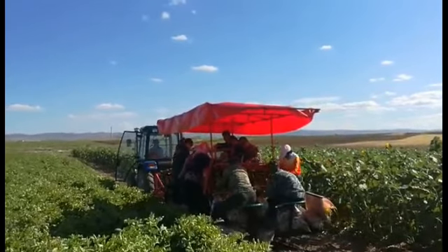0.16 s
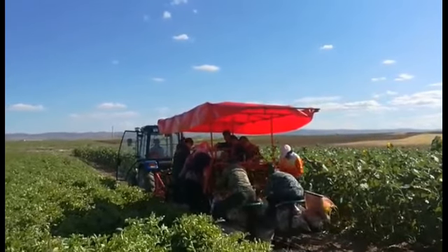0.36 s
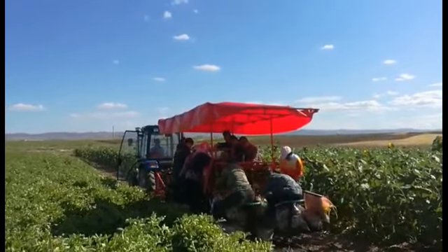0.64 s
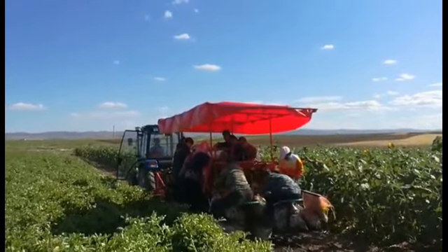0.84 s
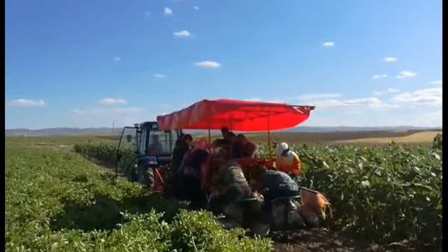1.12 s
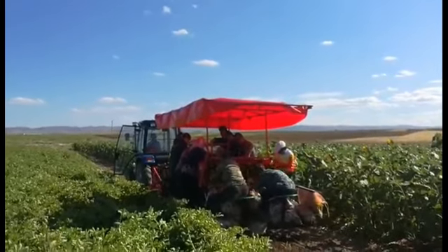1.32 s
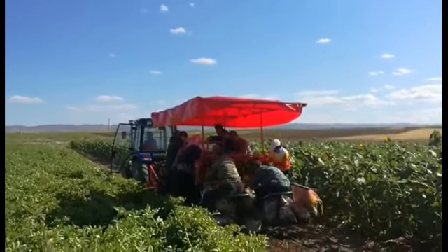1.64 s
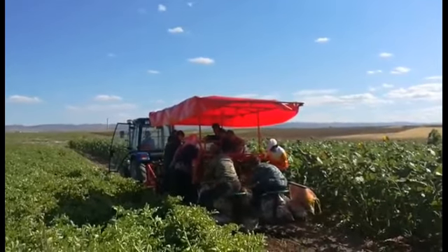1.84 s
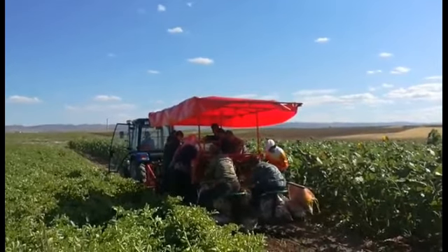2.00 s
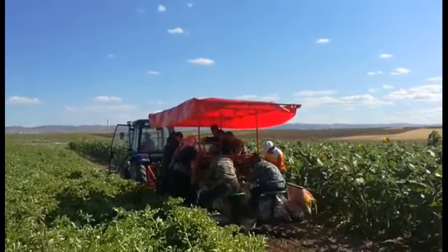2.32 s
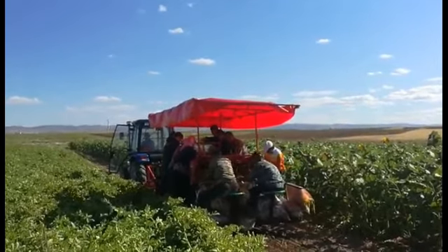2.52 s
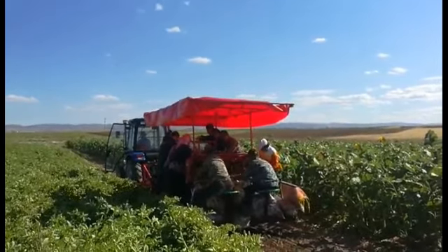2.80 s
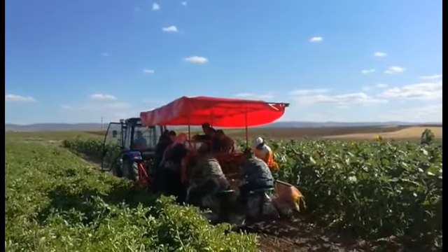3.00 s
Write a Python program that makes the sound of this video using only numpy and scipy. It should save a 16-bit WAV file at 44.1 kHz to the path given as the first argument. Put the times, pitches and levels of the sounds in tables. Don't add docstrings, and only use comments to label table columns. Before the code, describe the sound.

Tractor-drawn harvester rumbling, its metal web clattering in quick bursts while wind buffets the microphone.

```python
import sys
import numpy as np
from scipy import signal
from scipy.fft import rfft, irfft, next_fast_len
from scipy.io import wavfile
from scipy.ndimage import uniform_filter1d

SR = 44100
rng = np.random.default_rng(int(sys.argv[2]) if len(sys.argv) > 2 else 0)


def invert_db(level):
    return 10 ** (np.asarray(level, dtype=float) / 20)


def transcribe(signal):
    frames = np.atleast_2d(signal).T
    limited = np.clip(frames, -1, 1)
    pcm = np.round(limited * 32767).astype(np.int16)
    wavfile.write(sys.argv[1], SR, pcm)


N = 138915


def rms_one(x):
    return x / np.sqrt(np.mean(x ** 2) + 1e-20)


def in_time(rows):
    s, *columns = np.transpose(rows)
    return [np.interp(np.arange(N) / SR, s, c) for c in columns]


def at_hz(points, hz):
    point_hz, values = np.transpose(points)
    return np.interp(np.log(hz + 1), np.log(point_hz + 1), values)


def drift(rate_hz):
    r = np.exp(-80 * np.pi * rate_hz / SR)
    noise = rng.standard_normal(N // 40 + 2002)
    slow = signal.lfilter([1], [1, -2 * r, r * r], noise)[2000:]
    return np.interp(np.arange(N) / 40, np.arange(len(slow)), rms_one(slow))


def ring(hits, hz, t60_s):
    r, w = invert_db(-60 / (t60_s * SR)), 2 * np.pi * hz / SR
    return signal.lfilter([0, np.sin(w)], [1, -2 * r * np.cos(w), r * r], hits + 1e-18)


def coloured(x, spectrum):
    gain = invert_db(at_hz(spectrum, np.fft.rfftfreq(N, 1 / SR)))
    return irfft(rfft(x) * rms_one(gain), N)


def bandpass(x, order, low_hz, high_hz):
    return signal.sosfilt(signal.butter(order, [low_hz, high_hz], "band", fs=SR, output="sos"), x)


def clicks(per_s, spread_db):
    sizes = invert_db(spread_db * np.minimum(rng.exponential(1, N), 5)) * rng.choice([-1, 1], N)
    return rms_one(sizes * (rng.random(N) < per_s / SR))


def burst(start_s, decay_s, attack_s):
    t = np.maximum(np.arange(N) / SR - start_s, 0)
    return (1 - np.exp(-t / attack_s)) * np.exp(-t / decay_s)


# time_s, firing_hz
FIRING = [(0.0, 25.67), (1.81, 24.87), (3.15, 25.93)]
# multiple_of_firing, level_db
ORDERS = [(1, -45), (2, -43), (3, -44.5), (4, -46), (6, -49), (10, -54)]
# hz, density_db_per_hz
DRONE = [(15, -20), (25, -3.5), (59, -5.5), (94, 4), (137, 6), (249, -1), (321, -12), (700, -41.5),
         (910, -47.5), (1540, -120)]
DRONE_DB, DRONE_THROB_DB, DRONE_FADE_DB_PER_S = -41, 3, 1.5
ORDER_WOBBLE_DB = 3.5


def engine():
    turn = 2 * np.pi * np.cumsum(in_time(FIRING)[0]) / SR
    tones = np.zeros(N)
    for k, level_db in ORDERS:
        height = np.sqrt(2) * invert_db(level_db + ORDER_WOBBLE_DB * drift(5.1))
        tones += height * np.sin(k * turn + rng.uniform(0, 2 * np.pi))
    fade_db = DRONE_FADE_DB_PER_S * (np.arange(N) - N / 2) / SR
    gain = invert_db(DRONE_DB - fade_db + DRONE_THROB_DB * np.sin(turn))
    colour = DRONE[:-1] + [(1400, -120), (1540, -79.5)]
    return tones + gain * coloured(rng.standard_normal(N), colour)


# hz, width_hz, level_db
FRAME = [(560, 40, -4.5), (973, 175, 3.5), (1420, 79, 5), (1850, 87, 5.5), (2299, 75, 5), (2688, 59, 2.5),
         (2950, 200, -25.5), (4255, 610, -4.5)]


def frame(x):
    out = 0
    for k, (hz, width_hz, level_db) in enumerate(FRAME):
        r = np.exp(-np.pi * width_hz / SR)
        poles = [1, -2 * r * np.cos(2 * np.pi * hz / SR), r * r]
        out = out + (-1) ** k * invert_db(level_db) * signal.lfilter([1 - r, 0, r - 1], poles, x)
    return out


# hz, density_db_per_hz
GEAR = [(240, -40.5), (400, -4.5), (670, -5.5), (1000, -5.5), (1850, 0), (2460, -5), (4010, -9),
        (5000, -17.5), (6000, -32.5), (7350, -36), (8150, -42), (8690, -79), (11300, -99), (19100, -120)]
GEAR_DB, GEAR_PATCHY_DB = -44, 1.45
CHAIN_DB, CHAIN_PER_S = -45.5, 900


def running_gear():
    gear_level = invert_db(GEAR_DB + GEAR_PATCHY_DB * drift(14.0))
    gear = gear_level * coloured(rng.standard_normal(N), [(200, -62)] + GEAR)
    chain_level = invert_db(CHAIN_DB + drift(12.0))
    return gear + chain_level * rms_one(frame(clicks(CHAIN_PER_S, 2.0)))


# hz, density_db_per_hz
CLATTER = [(400, -18), (1000, -6), (2000, 2.5), (3500, 0), (5100, -5), (6200, -19), (8500, -28.5)]
# start_s, peak_db, ring_hz, clatter_db, decay_s
SHAKES = [(0.065, -29.5, 1880, 8, 0.015), (0.088, -30.5, 1930, 0.5, 0.072), (0.283, -25.5, 1950, 3, 0.021),
          (0.374, -27, 1866, 0, 0.046), (0.493, -32, 1670, 5, 0.027), (0.552, -35, 1810, 1, 0.086),
          (0.669, -28, 1920, -5, 0.046), (0.778, -36.5, 1830, 1, 0.034), (0.812, -41, 2010, 3.5, .02),
          (0.852, -26, 1955, -4, .05), (0.96, -34.5, 1850, 1.5, 0.035), (1.04, -32, 1510, 0, 0.048),
          (1.141, -24.5, 1937, -0.5, 0.022), (1.172, -27.5, 1850, 1.5, 0.014),
          (1.247, -25.5, 1910, -5.5, .03), (1.428, -31.5, 1420, 3.5, 0.013), (1.455, -30.5, 1710, 7, 0.017),
          (1.4946, -28.5, 1870, 2.5, 0.024), (1.514, -38, 4600, -2, 0.019), (1.54, -27, 1850, 0.5, 0.022),
          (1.721, -25.5, 1833, 0, 0.03), (1.831, -23.5, 1910, -0.5, 0.015), (1.956, -25.5, 1930, 2.5, .04),
          (2.001, -30, 2030, 0.5, 0.036), (2.119, -35.5, 1903, -1, 0.12), (2.234, -28.5, 1850, -6, 0.038),
          (2.309, -31.5, 1870, 3.5, 0.019), (2.412, -21.5, 1980, -4.5, 0.024),
          (2.459, -35, 1930, -17, 0.005), (2.57, -37, 1540, 5.5, 0.034), (2.587, -30.5, 1730, 0.5, 0.041),
          (2.642, -32.5, 1500, 4, 0.018), (2.716, -32, 1910, -2.5, 0.021), (2.797, -24, 1880, -3, 0.056),
          (2.875, -27.5, 1895, 0.5, 0.041), (2.938, -30, 2020, 7.5, 0.017), (3.006, -27, 1430, -1.5, 0.024),
          (3.105, -29.5, 1460, 1.5, .041)]
SHAKE_PER_S, SHAKE_ATTACK_S, SHAKE_T60_S = 2500, 0.013, 0.035
SHAKE_WIDE_DB, SHAKE_RING_DB, SHAKE_FRAME_DB = -5.5, -9.5, -12


def shakes():
    contacts = clicks(SHAKE_PER_S, 3.43)
    own, under, wide = np.zeros((3, N))
    for start_s, peak_db, ring_hz, clatter_db, decay_s in SHAKES:
        hits = invert_db(peak_db) * burst(start_s, decay_s, SHAKE_ATTACK_S) * contacts
        under += hits
        wide += invert_db(clatter_db) * hits
        own += ring(hits, ring_hz, SHAKE_T60_S) / np.sqrt(SHAKE_T60_S * SR / 53.6)
    clatter = coloured(wide, CLATTER)
    frame_ring = frame(under) / np.std(frame(contacts))
    return invert_db(SHAKE_WIDE_DB) * clatter + invert_db(SHAKE_RING_DB) * own + invert_db(SHAKE_FRAME_DB) * frame_ring


# start_s, peak_db
CLANKS = [
    (1.458, -42),
    (1.4636, -23.5),
    (1.506, -34),
    (3.012, -34),
]
# hz, level_db, t60_s
BAR = [(1145, -8, 0.097), (1600, -18, 0.039), (2325, 0, 0.062), (2800, -14, 0.03), (3125, 3, 0.062),
       (3400, -39, 0.0257), (4600, -10, 0.05), (5060, -17, 0.024), (8110, -24, 0.08), (8310, -31, 0.08)]
BAR_LATE_CYCLES, TOUCH_T60_S = 6.84, 0.012


def clanks():
    start_s, peak_db = np.transpose(CLANKS)
    out = np.zeros(N)
    for hz, level_db, t60_s in BAR:
        hits = np.zeros(N)
        at = ((start_s + BAR_LATE_CYCLES / hz) * SR).astype(int)
        hits[at] = invert_db(peak_db + level_db + rng.normal(0, 1, len(at)))
        touch = ring(hits, hz, TOUCH_T60_S)
        out += ring(touch, hz, t60_s) * 2 * np.log(1000) / (TOUCH_T60_S * SR)
    return out


THUMP_S, THUMP_DB = 1.545, -37


def thump():
    noise = bandpass(rng.standard_normal(N), 2, 300, 800)
    return invert_db(THUMP_DB) * burst(THUMP_S, 0.023, 0.011) * rms_one(noise)


# start_s, level_db
CHIRPS = [
    (0.271, -64.5),
    (0.604, -64),
    (1.5, -72),
    (2.18, -69.5),
]
CHIRP_HZ, CHIRP_S = 11400, 0.02


def chirps():
    t = np.arange(N) / SR
    swell = np.zeros(N)
    for start_s, level_db in CHIRPS:
        swell += invert_db(level_db) * np.exp(-((t - start_s - CHIRP_S / 2) / CHIRP_S * 2) ** 2)
    return swell * np.sin(2 * np.pi * CHIRP_HZ * t + 2.0 * drift(60.0))


# centre_s, level_db, half_length_s, hz, width_hz
LEAVES = [(1.167, -73.5, .012, 9350, 700), (1.222, -73, .022, 8670, 607), (1.487, -53.5, 0.032, 8270, 900),
          (1.468, -62, 0.012, 8900, 1000), (1.617, -76.5, .012, 9400, 696), (1.745, -77, .014, 8500, 800),
          (2.2, -71, .014, 9050, 910), (2.64, -80, .02, 13530, 2400), (2.655, -68.5, .014, 9550, 2500),
          (2.745, -79, .016, 9100, 1000), (2.8, -68, .026, 8940, 1000), (2.805, -69, .026, 12700, 1920),
          (2.815, -71.5, .016, 14650, 700), (2.95, -64, .026, 9000, 2000), (2.955, -78, .022, 11600, 1500),
          (3.065, -86, .015, 9900, 500), (3.135, -72, .02, 12100, 1550), (3.135, -70, .016, 9100, 700)]


def leaves():
    t, out = np.arange(N) / SR, np.zeros(N)
    grains = clicks(6300, 3.0)
    for centre_s, level_db, half_length_s, hz, width_hz in LEAVES:
        rustle = rms_one(bandpass(grains, 4, hz - width_hz / 2, hz + width_hz / 2))
        out += invert_db(level_db) * np.exp(-((t - centre_s) / half_length_s) ** 4) * rustle
    return out


# time_s, level_db
GUST = [(0, -43), (.09, -37), (.2, -43), (.37, -35.5), (.6, -49.5), (.7, -34.5), (.76, -40), (.84, -34.5),
        (.95, -42.5), (1.1, -37.5), (1.2, -47), (1.33, -30.5), (1.52, -52.5), (1.63, -45.5), (1.7, -35.5),
        (1.82, -42.5), (2.3, -42.5), (3.15, -61)]
WIND_DB, WIND_LUMP_DB, WIND_APART_DB = 4.5, 4.5, -5.5
WIND_LOW_HZ, GUST_TOP_HZ, GUST_OPENS = 44.57, 178, 0.05
WIND_EVEN = 0.6


def wind():
    level_db, = in_time(GUST)
    top_hz = GUST_TOP_HZ * invert_db(GUST_OPENS * (level_db - level_db.mean()))
    edges_hz, out = WIND_LOW_HZ * 2 ** np.arange(-1, 4.1, .5), 0
    for low_hz, high_hz in zip(edges_hz, edges_hz[1:]):
        mid, side = bandpass(rng.standard_normal((2, N)), 2, low_hz, high_hz)
        hz = np.sqrt(low_hz * high_hz)
        slopes = (1 + (hz / top_hz) ** 8) * (1 + (WIND_LOW_HZ / hz) ** 4)
        gain = invert_db(WIND_LUMP_DB * drift(hz / 25.0)) / np.sqrt(slopes * top_hz / SR * 2)
        out = out + gain * (mid + invert_db(WIND_APART_DB) * hz / 150 * side * [[1], [-1]])
    swell = uniform_filter1d(np.mean(out ** 2, axis=0), size=1500)
    level = invert_db(level_db + WIND_DB + 0.27 * drift(36.0))
    return level * out * (swell.mean() / swell) ** (WIND_EVEN / 2)


# centre_s, peak_db, pitch_hz, length_cycles
BUFFETS = [(0.027, -26.5, 70.2, 9.5), (0.149, -26, 63.7, 3.3), (0.36, -18.5, 89, 4.5),
           (0.422, -23.5, 85, 7.7), (0.462, -14.5, 97.4, 2.24), (0.517, -19, 100, 3.7),
           (0.558, -17.5, 81, 0.51), (0.593, -21.5, 72.5, 2.5), (0.692, -29.5, 108, 4.8),
           (0.788, -23, 103, 5.3), (0.827, -18.5, 194, 2.3), (0.873, -22, 103.5, 3.3),
           (1.004, -22, 108, 3.5), (1.006, -16.5, 153, 4.5), (1.284, -20, 145, 4.3),
           (1.229, -26.5, 112, 3.3), (1.326, -26.5, 119, 4.6), (1.352, -32, 99, 3.2), (1.378, -21, 90, 3.3),
           (1.399, -18, 153, 2.3), (1.687, -16, 99, 0.84), (1.718, -13.5, 110, 0.54),
           (1.745, -24.5, 60, 0.55), (1.77, -19, 86, 1.5), (1.805, -14.5, 175, 0.86),
           (1.824, -17, 60, 0.74), (1.85, -24.5, 100, 2.5), (1.899, -29, 87.5, 1.9),
           (2.102, -22.5, 88, 0.86), (2.002, -17, 138, 2.5), (2.01, -22, 49, 2.4), (2.203, -23, 68, 2.47),
           (2.233, -22.5, 130, 3), (2.315, -25, 76, 2.6), (2.331, -20, 134, 3.8), (2.502, -25, 90, 2.5),
           (0.291, -27, 74.5, 1.8), (.385, -24, 202, 4.9), (1.434, -23, 90.5, 1.7), (2.689, -28, 90, 3.2)]
BUFFET_DB, BUFFET_LAG_S = -0.5, 0.00059


def buffets():
    t, out = np.arange(N) / SR, np.zeros((2, N))
    for centre_s, peak_db, pitch_hz, cycles in BUFFETS:
        lag, turn = rng.standard_normal(2)
        u = (t - centre_s - BUFFET_LAG_S * lag * np.array([[1], [-1]])) * pitch_hz
        wave = np.cos(2 * np.pi * u + 0.41 * cycles * turn)
        out += invert_db(peak_db + BUFFET_DB) * wave * np.exp(-(2 * u / cycles) ** 2)
    return out


MACHINE_TOP_HZ = 8105


def dulled(x):
    return irfft(rfft(x) / (1 + (np.fft.rfftfreq(N, 1 / SR) / MACHINE_TOP_HZ) ** 30), N)


# hz, lead_rad
LEAD = [(0, 0), (260, -0.06), (690, 1.5), (950, -0.9), (1640, 1), (2240, -1.33), (2840, -8), (3530, -5),
        (4650, -7), (6370, -8.5), (8440, 3)]
# hz, lean_db
LEAN = [(60, -1.5), (300, 2.5), (1000, 0), (2000, 3), (4000, 8), (6000, 4.5), (8000, 5.5), (12000, 1.5)]
# hz, share_db
SCATTER = [(60, -30.5), (300, -16.5), (700, -12.5), (1500, -7), (2500, -3), (4000, -1.1), (8000, 0)]


def ports(x, scatter_s, size=next_fast_len(N + SR)):
    hz, tail_s = np.fft.rfftfreq(size, 1 / SR), np.arange(SR) / SR
    smear = rng.standard_normal((2, SR)) * np.exp(-tail_s / scatter_s)
    smear = rfft(smear / np.sqrt(np.sum(smear ** 2, axis=1, keepdims=True)), size)
    share = np.clip(invert_db(at_hz(SCATTER, hz)), 0, 1)
    half = np.array([[.5], [-.5]])
    direct = np.sqrt(1 - share ** 2) * np.exp(1j * half * np.interp(hz, *np.transpose(LEAD)))
    lean = invert_db(half * at_hz(LEAN, hz))
    return irfft(rfft(x, size) * lean * (direct + share * smear), size)[:, :N]


FIELD_SCATTER_S, SHAKE_SCATTER_S, NEAR_SCATTER_S = 0.2, 0.011, 0.005


def scene():
    steady = ports(dulled(engine() + running_gear()), FIELD_SCATTER_S, size=N)
    near = ports(clanks() + (chirps() + leaves()), NEAR_SCATTER_S)
    web = ports(dulled(shakes() + thump()), SHAKE_SCATTER_S)
    return steady + near + web + (wind() + buffets())


DUCK_HZ, DUCK_FROM_DB = 6200, -27
DUCK_TREBLE, DUCK_ALL = 12, 0.12


def top_cut(x):
    return signal.sosfilt(signal.butter(12, 14800, fs=SR, output="sos"), x)


def record(dry):
    loud_db = 10 * np.log10(uniform_filter1d(np.mean(dry, axis=0) ** 2, size=1800) + 1e-12)
    loss = 1 - invert_db(-DUCK_TREBLE * np.maximum(loud_db - DUCK_FROM_DB, 0))
    hz = np.fft.rfftfreq(N, 1 / SR)
    treble = irfft(rfft(dry) / (1 + (DUCK_HZ / (hz + 1)) ** 16), N)
    over_db = np.maximum(uniform_filter1d(loud_db, size=4000) - DUCK_FROM_DB + 3, 0)
    return top_cut(invert_db(-DUCK_ALL * over_db) * (dry - loss * treble))


dry = scene()
out = record(dry)
transcribe(out)
```